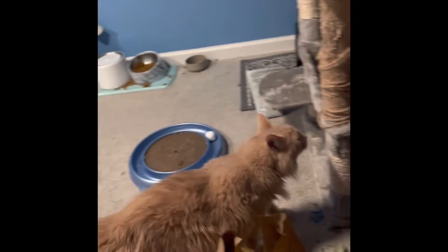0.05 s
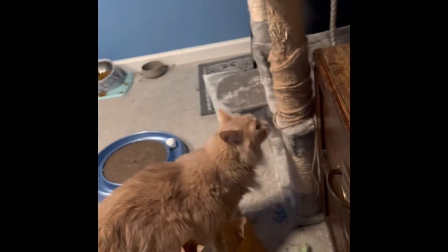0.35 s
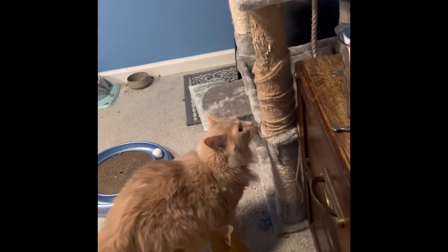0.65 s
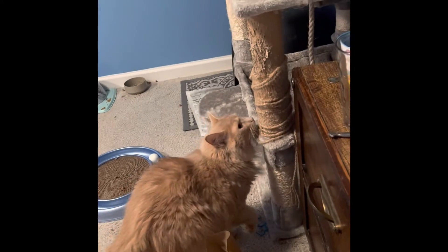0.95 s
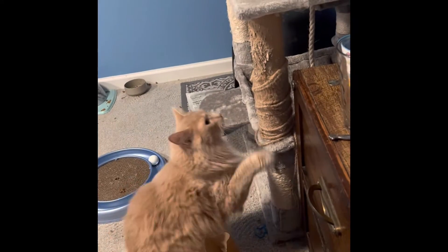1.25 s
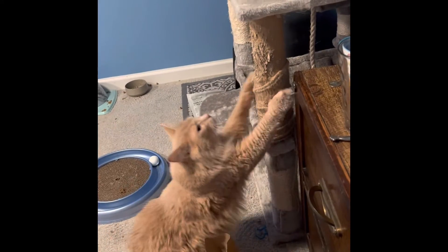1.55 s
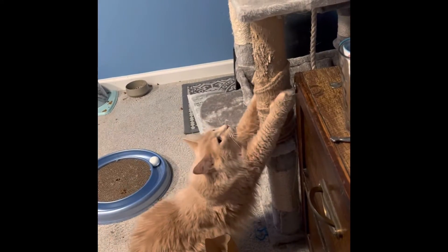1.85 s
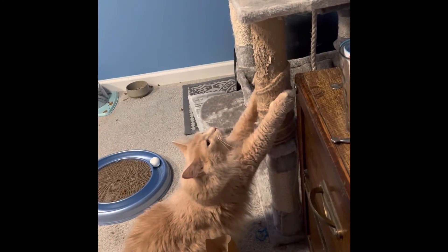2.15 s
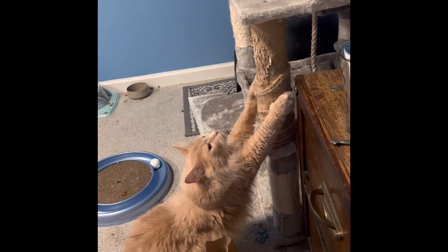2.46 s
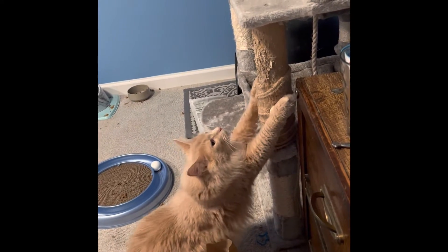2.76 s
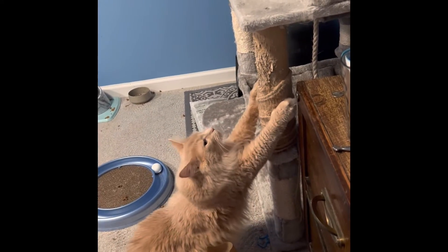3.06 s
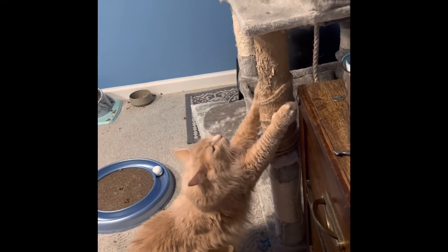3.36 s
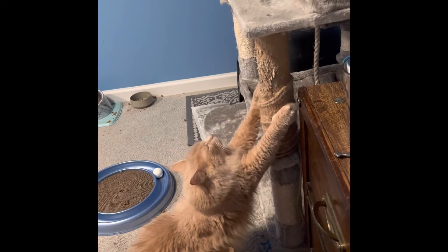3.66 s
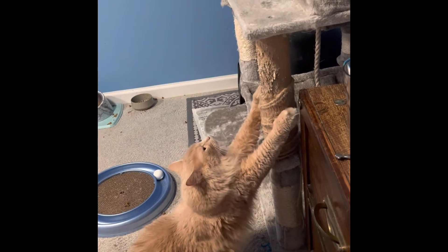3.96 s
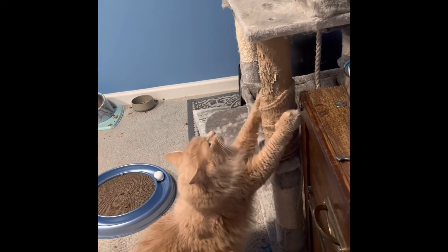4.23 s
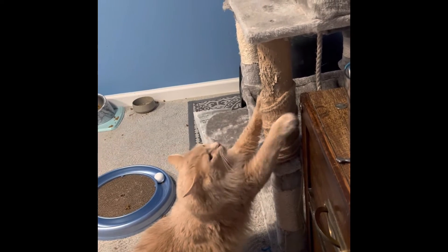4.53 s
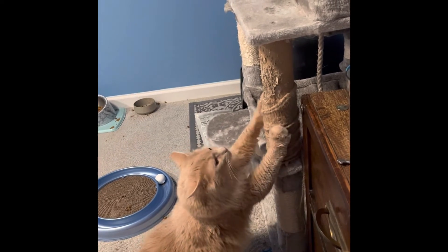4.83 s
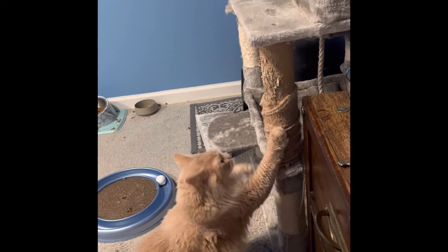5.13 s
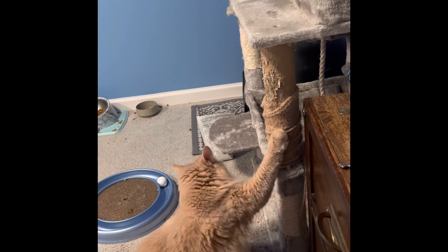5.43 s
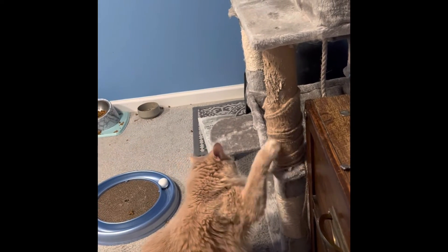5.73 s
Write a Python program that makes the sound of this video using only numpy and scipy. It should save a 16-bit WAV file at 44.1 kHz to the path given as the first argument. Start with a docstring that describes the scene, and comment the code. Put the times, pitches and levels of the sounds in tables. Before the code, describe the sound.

A fan rushes and hums steadily for the whole six seconds in a small carpeted bedroom, over a boomy low rumble that briefly swells and sinks. A phone microphone listens from just above a cat. Right at the start its weight lands with a dull thump and two softer ones; another soft pair follows at about 1.2 seconds. From around 1.5 seconds, rope fibres crackle faintly as it works a scratching post. Claws snag and snap out of the rope in short, dry ticks at 1.8 seconds and several times between 2.2 and 2.8, with low thuds near 1.9 and 2.6. A cluster of heavier thumps comes between 4.2 and 4.6 seconds, loudest at 4.4. A brief rasp at 4.5 leads to sharper snaps around 4.8 to 4.9. A soft thud at 5.4 and two more snaps at 5.5 and 5.7 finish over the fan.

```python
"""Cat at the scratching post

A cat stretches up a rope-wrapped post in a small carpeted bedroom, heard from a phone just above it.
A fan rushes and hums throughout, over a boomy rumble that swells and sinks. The cat's weight thumps
post and floor, single fibres crackle faintly under the paws, and claws snag and snap out of the rope."""
import sys
import numpy as np
from scipy import signal
from scipy.fft import rfft, irfft
from scipy.io import wavfile
from scipy.ndimage import uniform_filter1d

SR = 44100
rng = np.random.default_rng(int(sys.argv[2]) if len(sys.argv) > 2 else 0)


def master(y):
    """Save y as 16-bit WAV."""
    cut = np.clip(np.atleast_2d(y).T, -1, 1)
    pcm = np.round(cut * 32767)  # scale
    wavfile.write(sys.argv[1], SR, pcm.astype(np.int16))


N = 259749
TIME = np.arange(N) / SR
FREQS = np.maximum(np.fft.rfftfreq(N, 1 / SR), 1)


def undb(db):
    """Decibels to gain."""
    return 10 ** (np.asarray(db) / 20)


def automation(points):
    """Join (t/s, value) breakpoints with straight ramps."""
    return np.interp(TIME, *np.transpose(points))


def eq_curve(points):
    """Join (f/Hz, value) breakpoints on a log-frequency axis."""
    hz, values = np.transpose(points)
    return np.interp(np.log(FREQS), np.log(hz), values)


def drift(rate_hz):
    """Smooth random modulation: sample-and-hold, slewed twice, with a spread near 1."""
    hold = int(SR / rate_hz)
    steps = np.repeat(rng.standard_normal(N // hold + 1), hold)
    return 1.3 * uniform_filter1d(uniform_filter1d(steps, hold), hold)[:N]


def white_spectrum():
    """Spectrum of white noise at 0 dB per Hz."""
    return rfft(rng.standard_normal(N)) * np.sqrt(SR / 2)


def place(track, start_s, sound):
    """Mix a sound into a track at its cue."""
    i = max(int(start_s * SR), 0)
    track[i:i + len(sound)] += sound[:N - i]


def bedroom(dry, t60_s, wet_db, width, damping_hz=8500):
    """Direct sound plus a short stereo tail off the walls; carpet and bedding soak up its treble."""
    t = TIME[:SR // 2]
    tails = rng.standard_normal((2, len(t))) * undb(-60 * t / t60_s) * (t > .005)
    tails *= undb(wet_db) / np.linalg.norm(tails[0])
    tails = signal.sosfilt(signal.butter(8, damping_hz, fs=SR, output="sos"), tails)
    mid, side = (signal.fftconvolve(dry, tail)[:N] for tail in tails)
    return dry + mid + width * np.array([side, -side])


# Air rush common to both ears, before the peaks and dips: f/Hz, density/dB per Hz
AIR_MID = [(15, -85), (45, -70), (100, -66.5), (250, -61), (455, -66), (505, -77.5), (880, -75.5),
           (1850, -88), (3000, -88.5), (3400, -94.5), (7600, -96.5), (11500, -109), (12300, -121),
           (12500, -142)]
# Peaks and dips in the rush, including the phone microphone's 5 kHz notch: f/Hz, width/Hz, gain/dB
RUSH_EQ = [(58.6, 11.4, 12), (348, 32, 4), (390, 16, -3), (578, 59, 6.5), (632, 18, -2.5), (709, 95, 5.5),
           (909, 89, 3.5), (917, 14, 1), (1147, 63, 3.5), (1313, 29, 3), (1492, 47, 4), (4984, 440, -6.5),
           (7000, 150, 3.5), (10140, 340, 3)]
# Thin whistles, as narrow boosts of the rush: f/Hz, width/Hz, gain/dB
AIR_WHISTLES = [(1820, 45, 3.5), (2440, 20, 6.5), (2496, 14, 8.5), (2965, 40, 2)]
# Stereo width of the hiss, nearly mono from 5.8 to 7.5 kHz: f/Hz, side density/dB per Hz
HISS_WIDTH = [(350, -94), (620, -88), (820, -84.5), (1900, -103), (2480, -93), (3100, -94.5), (4000, -102),
              (5100, -95), (5550, -103), (5850, -122), (7450, -122), (7650, -103.5), (12500, -108),
              (15500, -114)]
# How strongly the air reaches the left mic port first: f/Hz, correlation/-1..1
AIR_LEFT_LEAD = [(300, -0.21), (2700, .5), (3700, -.3), (4900, -.65), (5250, .45), (7700, -0.51),
                 (10000, -.8)]
# Balance of the rush: f/Hz, left minus right/dB
AIR_BALANCE = [(650, -0.1), (850, -3), (1600, 0.5), (2600, -0.5), (3300, 3), (4000, 1.5), (5500, -0.5)]

def fan_air(flicker_db=0.53, mono_below_hz=340):
    """The bed: turbulent air coloured by peaks and dips, centred in the bass and wider above."""
    bells = RUSH_EQ + AIR_WHISTLES
    colour_db = sum(db * 2 ** -((2 * (FREQS - hz) / width) ** 2) for hz, width, db in bells)
    direct, diffuse = white_spectrum(), white_spectrum()
    mid = direct * undb(eq_curve(AIR_MID) + colour_db)
    # a small lag between the ports puts the side signal a quarter cycle out of step
    lead = np.clip(eq_curve(AIR_LEFT_LEAD), -1, 1)
    side = (1j * lead * direct + np.sqrt(1 - lead ** 2) * diffuse) * undb(eq_curve(HISS_WIDTH))
    # long waves reach both ports alike
    ears = np.array([[1], [-1]]) / (1 + (mono_below_hz / FREQS) ** 4)
    pan = undb(ears * eq_curve(AIR_BALANCE) / 2)
    return irfft((mid + ears * side) * pan, N) * undb(flicker_db * drift(9))


# Blade tones: f/multiple of the shaft rate, level/dB
BLADE_TONES = [(1, -54), (4, -42), (5, -52), (8, -44), (9, -59.5), (11, -44), (12, -48), (22, -52.5)]
# Steady motor hum: f/Hz, level/dB
MOTOR_HUM = [(72.5, -46.5), (120, -50.5)]

def fan_tones(shaft_hz=25.555, wobble=0.00069, flutter_db=0.84):
    """Blade tones locked to a slightly unsteady shaft, over the motor's hum."""
    turns = np.cumsum(shaft_hz * (1 + wobble * drift(2.82))) / SR
    blades = np.zeros(N)
    for order, db in BLADE_TONES:
        gain = undb(db + flutter_db * drift(2.92))
        blades += gain * np.sin(2 * np.pi * (order * turns + rng.random()))
    motor = sum(undb(db) * np.sin(2 * np.pi * (hz * TIME + rng.random())) for hz, db in MOTOR_HUM)
    return np.sqrt(2) * (blades + motor)


# Fader ride of the boomy rumble: t/s, level/dB
RUMBLE_RIDE = [(0.0, -27.5), (0.1, -37), (2.17, -39), (2.33, -31), (2.38, -38.5), (2.44, -33.5),
               (2.55, -30.5), (2.62, -40.5), (2.89, -40), (2.95, -27.5), (3.03, -40.5), (3.25, -32),
               (3.33, -36.5), (4.45, -39), (4.51, -45), (4.59, -27.5), (4.69, -45), (4.95, -32),
               (4.99, -37.5), (5.89, -38.5)]

def rumble(centre_hz=159.8, width_hz=47.5, leveller_s=0.16):
    """A narrow, boomy noise band that flutters at random while its level swells and sinks."""
    band = irfft(white_spectrum() / (1 + (2 * (FREQS - centre_hz) / width_hz) ** 4), N)
    band /= np.sqrt(uniform_filter1d(band ** 2, size=int(leveller_s * SR)))
    return band * undb(automation(RUMBLE_RIDE))


# Low modes of the post standing on the floor: f/Hz, relative level/dB, t60/s
POST_MODES = [(40.6, -1, 0.18), (54, 3, 0.24), (70.8, 1.5, 0.23), (109.3, 6, 0.1), (159, 3, 0.085)]

def post_thud(contact_ms):
    """A soft push rings the post's low modes; longer contact gives a duller thud."""
    t = TIME[:SR // 3]
    ring = sum(undb(db - 60 * t / t60) * np.cos(2 * np.pi * hz * t) for hz, db, t60 in POST_MODES)
    push = np.sin(np.pi * np.minimum(t * 1000 / contact_ms, 1)) ** 2
    # only the changing motion of the boards moves the air
    pressure = -np.gradient(signal.fftconvolve(push, ring)[:len(t)])
    return pressure / np.abs(pressure).max()


# The cat's weight landing on post and floor: t/s, dry peak level/dB, contact/ms
LANDINGS = [(0.006, -15, 12.4), (0.094, -26.5, 10.6), (0.113, -23, 11.4), (1.149, -26, 11),
            (1.205, -26, 6.9), (1.892, -20, 8.9), (1.935, -30, 11), (2.531, -25.5, 3.8), (2.568, -20, 7.3),
            (2.673, -27, 13), (4.155, -26, 13), (4.296, -20, 9.5), (4.308, -17.5, 12.2),
            (4.427, -12.5, 8.5), (4.5932, -16.5, 5.4), (4.606, -22, 16), (5.444, -28, 13)]

def body_thumps(settle_s=0.0193, settle_db=-9.5, settle_contact_ms=13.7):
    """The cat's weight lands, then settles with a second, softer push."""
    track = np.zeros(N)
    for start_s, db, contact_ms in LANDINGS:
        place(track, start_s, undb(db) * post_thud(contact_ms))
        place(track, start_s + settle_s, undb(db + settle_db) * post_thud(settle_contact_ms))
    return bedroom(track, t60_s=0.52, wet_db=-10, width=0)


# Modes of a claw, damped by the rope it grips: f/multiple of claw f, width/multiple of rope's, gain/dB
CLAW_MODES = [(1, 1.7, 0), (1.55, 2.6, -6.5), (2.55, 2, -24)]

def rope_ring(force, rope_hz, width_hz, claw_hz, claw_db, cutoff_hz):
    """A contact force rings rope and claw; a steep high cut takes off the very top."""
    hz = np.maximum(np.fft.rfftfreq(len(force), 1 / SR), 1)

    def mode(centre, width):
        return 1 / (1 + 1j * (hz ** 2 - centre ** 2) / (hz * width))

    claw = sum(undb(db) * mode(ratio * claw_hz, wider * width_hz) ** 2 for ratio, wider, db in CLAW_MODES)
    ring = mode(rope_hz, width_hz) ** 2 + undb(claw_db) * claw
    phone_notch = 1 - (1 - undb(-14)) * mode(centre=4850, width=560)
    rung = irfft(rfft(force) * ring * phone_notch, len(force))
    return signal.sosfilt(signal.butter(16, cutoff_hz, fs=SR, output="sos"), rung)


# How hard the paws work the rope: t/s, gain/dB
PAW_EFFORT = [(0, -12), (1.3, -8), (1.6, 1), (2.3, -4), (3.0, -3), (3.9, -1), (4.8, -5.5), (5.89, -7)]

def fibre_crackle(per_second=30, force_db=-34, scatter_db=1.0):
    """Single rope fibres give way at random, ticking louder as the paws pull harder."""
    breaks = rng.random(N) < per_second / SR
    size = np.clip(rng.standard_normal(N), -2, 2)
    ticks = breaks * undb(force_db + scatter_db * size + automation(PAW_EFFORT))
    crackle = rope_ring(ticks, rope_hz=2400, width_hz=1500, claw_hz=6700, claw_db=-8, cutoff_hz=10700)
    return bedroom(crackle, t60_s=0.2, wet_db=-4, width=0.7)


# Claws snapping out of the rope: t/s, dry level over 2 ms/dB, rope f/Hz, ring width/Hz, claw f/Hz,
# claw against rope/dB, tear's time to fall 20 dB/ms, pluck against tear/ratio, high cut/Hz
CLAW_HITS = [(1.7989, -44.8, 2200, 2600, 7500, 9, 1.2, 2, 12000),
             (2.204, -38.5, 2400, 1700, 6000, -19, 1.0, 4, 9000),
             (2.304, -51, 2500, 1200, 6400, 6, 1.5, 1, 10000),
             (2.49, -47, 2800, 1600, 6700, -13, 6, .6, 11000),
             (2.6576, -46.5, 2750, 1500, 6300, -15, 1.2, 1.7, 11000),
             (2.7933, -37, 2930, 780, 6000, -7.5, 1.0, 5, 16500),
             (4.536, -43.5, 2200, 2600, 6900, -12, 7, .25, 11500),
             (4.8355, -41, 1710, 650, 5700, 1, 1.0, 4, 12200),
             (4.837, -37, 1550, 1200, 7200, -17, 2, 1.6, 11000),
             (4.841, -45, 2500, 2400, 6300, -17, 4.5, .4, 10900),
             (4.914, -40, 2530, 2400, 7100, -15, 4, 0.65, 8500),
             (5.5394, -45, 3000, 1900, 7600, -2, 1.4, 2, 9500),
             (5.705, -42, 2150, 2400, 7000, -20, 1.2, 2.1, 9000)]

def claw_snaps(samples=2048):
    """Each snap is a few milliseconds of tearing fibres; a taut strand pings, a slack one rasps."""
    track, ms = np.zeros(N), 1000 * TIME[:samples]
    for start_s, db, rope_hz, width_hz, claw_hz, claw_db, decay_ms, pluck, cutoff_hz in CLAW_HITS:
        tear = rng.standard_normal(samples) * undb(-20 * ms / decay_ms)
        tear[0] = pluck * np.linalg.norm(tear)  # the first fibre lets go with one clean pluck
        force = np.pad(tear, (0, samples))
        snap = rope_ring(force, rope_hz, width_hz, claw_hz, claw_db, cutoff_hz)[:samples]
        snap *= np.sqrt(.002 * SR / np.sum(snap ** 2))  # the energy of 2 ms at 0 dB
        place(track, start_s, undb(db) * snap)
    return bedroom(track, t60_s=0.072, wet_db=-8.5, width=0.6)


def scene():
    """The fan fills the room; the cat works the post in the centre."""
    bed = fan_air() + fan_tones() + rumble()
    return bed + body_thumps() + claw_snaps() + fibre_crackle()


def record(dry):
    """The phone's steep high cut at 15.8 kHz."""
    return signal.sosfilt(signal.ellip(8, .2, 70, 15800, fs=SR, output="sos"), dry)


dry = scene()
out = record(dry)
master(out)
```